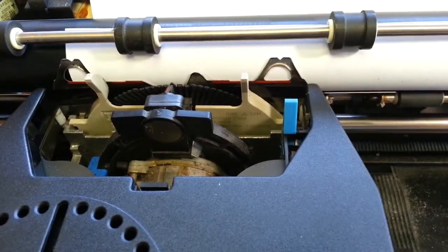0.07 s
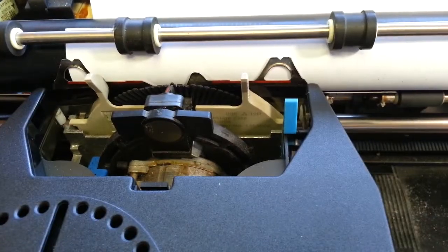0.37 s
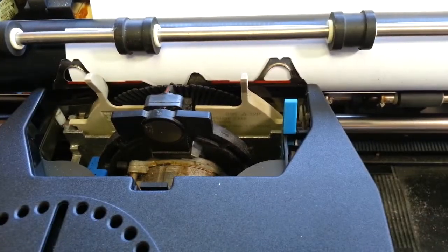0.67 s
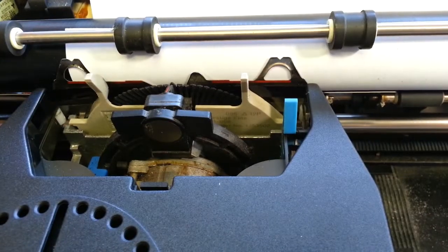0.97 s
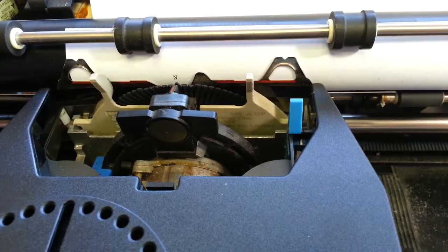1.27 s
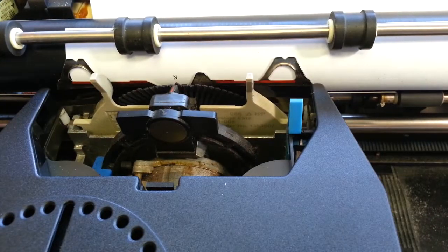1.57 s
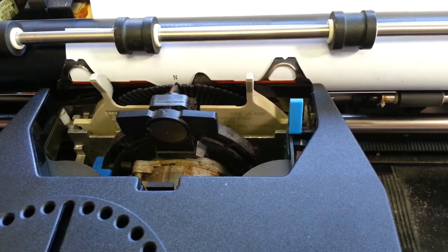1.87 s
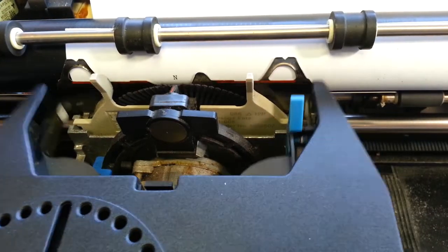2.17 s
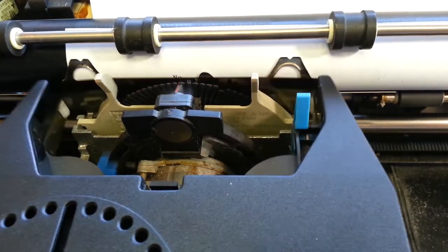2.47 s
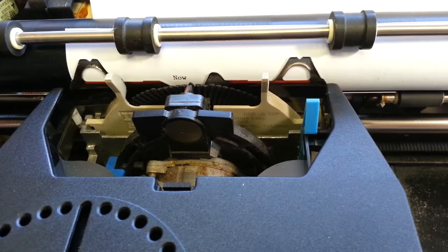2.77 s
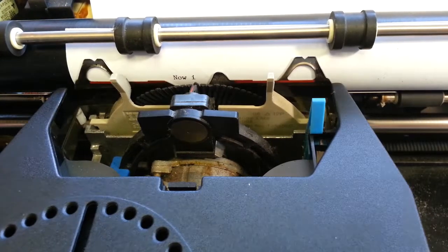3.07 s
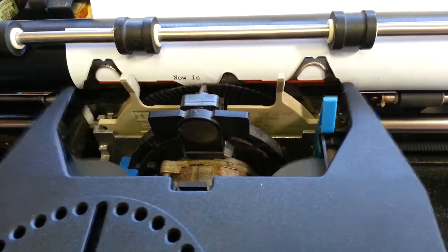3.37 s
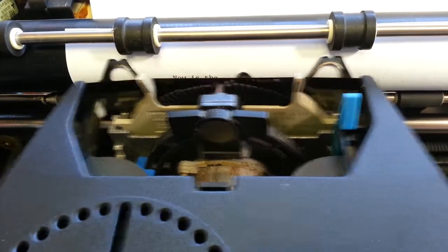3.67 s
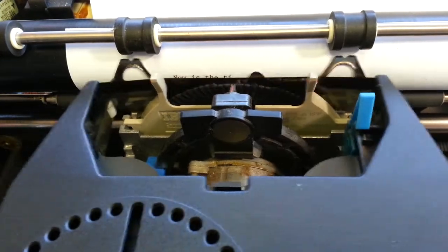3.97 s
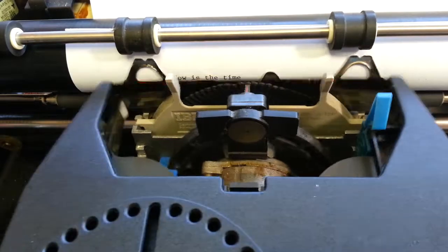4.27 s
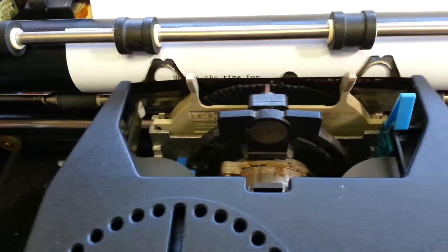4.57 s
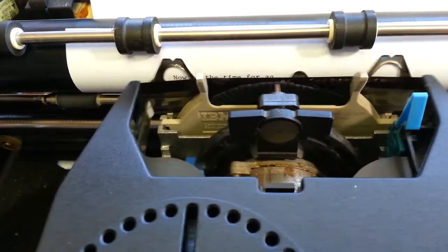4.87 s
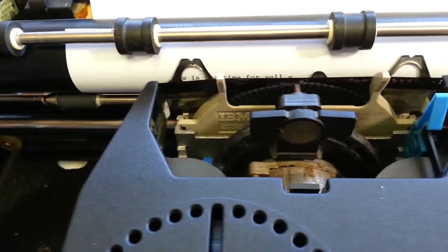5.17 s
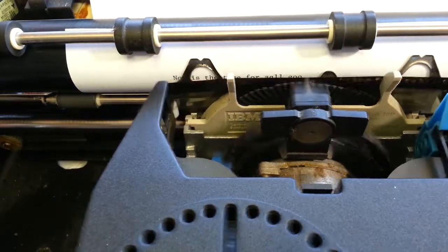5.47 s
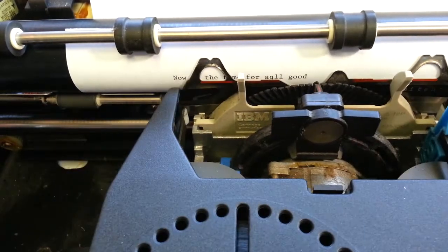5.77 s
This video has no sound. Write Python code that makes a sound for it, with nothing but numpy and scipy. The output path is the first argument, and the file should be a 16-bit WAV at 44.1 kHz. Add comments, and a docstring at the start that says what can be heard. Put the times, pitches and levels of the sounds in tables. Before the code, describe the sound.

An electric typewriter idles with a faint hum and whirr in a quiet workshop. A few light key clicks lead to one sharp letter strike. After a pause of about a second, typing resumes and quickens into uneven bursts of metallic cracks, with rattling levers and the knock of the carrier stepping along. The stereo microphones are very close, and the room adds little echo.

```python
"""Electric ball typewriter, close up.

A quiet workshop, a stereo pair of microphones just above the carrier: a few keys, one letter, then a
quick line. Each letter is a print cycle: clutch and linkages rattle, the type ball cracks against the
platen, the carrier steps and knocks home. The motor hums underneath, and the hardest blows overload
the microphones."""
import sys
import numpy as np
from scipy import signal
from scipy.fft import rfft, irfft, next_fast_len
from scipy.io import wavfile
from scipy.ndimage import uniform_filter1d, map_coordinates

SR = 44100
rng = np.random.default_rng(int(sys.argv[2]) if len(sys.argv) > 2 else 0)


def digitize_waveform(pressure):
    """Quantize a signal to 16-bit integers and store it at the path in sys.argv[1].

    Rows of a 2-D input are taken as channels; values are limited to [-1, 1].
    """
    field = np.atleast_2d(pressure).T
    bounded = np.clip(field, -1, 1)
    quanta = np.round(bounded * 32767).astype(np.int16)
    wavfile.write(sys.argv[1], SR, quanta)


N = 265173

# letters, as the ball meets the platen: t/s, then relative level/dB of ball, rocker, carrier, ball turn
STRIKES = [(1.146, -1.5, 3, 2, 3), (2.2826, -4.5, 2, 2.5, -2), (2.5391, -7, -1, 1, -6),
           (3.0054, -5.5, 5, 4, 1), (3.2185, -7, 0, -1, 1), (3.4941, -8, -1, 1, -3),
           (3.5619, -4, -2, -3, 0), (3.6462, -6.5, 0, 1, 4), (3.9224, -6, 5, -2, 1),
           (3.9845, -9, -2, -1, -1), (4.0469, -7, -5, -3, 0), (4.1097, -9.5, -1, -5, 3),
           (4.3631, -7, 0, 0, -1), (4.4455, -7, 2, 1, 3), (4.5082, -8, -5, -1, 4), (4.7905, -8, 0, -4, -2),
           (4.8681, -5.5, 0, -2, 0), (4.9463, -6.5, 2, 1, 2), (5.0078, -8.5, -2, -1, 0),
           (5.157, -4.5, -7, 0, 0), (5.2471, -4.5, 0, 1, -2), (5.4605, -7, 3, 1, -6),
           (5.5285, -1.5, 1, 6, 4)]
# spaces, as the carrier lands: t/s, latch lead/s, relative level/dB of latch and landing's three bands
SPACES = [(2.702, .069, -2, -7, -12.5, -28), (3.283, .078, 1, -13, -12, -17),
          (3.733, .045, -12, -15, -13, -14), (4.272, .073, 2, -15, -10, -14),
          (4.602, .055, 1, -11, -14.5, -36), (5.105, .07, -1, -14, -16, -22),
          (5.714, .046, 1, -6, -5.5, -27), (5.965, .058, -7, -6.5, -8.5, -17)]
# stretches of typing, linkages in motion: start t/s, end t/s, relative level/dB
TYPING_RUNS = [(1.07, 1.29, -1.5), (2.197, 2.69, -2.5), (2.757, 2.775, -4), (2.915, 4.72, .5),
               (4.745, 5.745, -1.2), (5.945, 5.975, -3)]
# the three bands of a contact (body, middle, edge): low f/Hz, high f/Hz
BANDS = [(400, 1000), (1000, 2800), (2800, 15500)]


def amp(db):
    """Decibels to gain."""
    return 10 ** (np.asarray(db) / 20)


def unit(x):
    """x at rms 1."""
    return x / np.sqrt(np.mean(x ** 2) + 1e-20)


def along(points, hz):
    """Interpolate (f/Hz, value) points on a log axis."""
    f, value = np.transpose(points)
    return np.interp(np.log(hz + 1), np.log(f + 1), value)


def add(track, start, sound):
    """Lay a stereo sound into the track at start seconds."""
    part = track[:, max(round(start * SR), 0):][:, :sound.shape[1]]
    part += sound[:, :part.shape[1]]


def filtered(x, response):
    """Pass x through a complex frequency response."""
    n = x.shape[-1]
    size = next_fast_len(n + SR // 8, True)
    return irfft(rfft(x, size) * response(np.fft.rfftfreq(size, 1 / SR)), size)[..., :n]


def coloured(x, tone, size=2048):
    """Minimum-phase filter through (f/Hz, level/dB) points."""
    cepstrum = irfft(np.log(amp(along(tone, np.fft.rfftfreq(size, 1 / SR)))))
    cepstrum[1:size // 2] *= 2
    cepstrum[size // 2 + 1:] = 0
    kernel = irfft(np.exp(rfft(cepstrum))).reshape((1,) * (x.ndim - 1) + (-1,))
    return signal.fftconvolve(x, kernel, axes=-1)[..., :x.shape[-1]]


def band(x, edges, order=3):
    """Causal band-pass."""
    return signal.sosfilt(signal.butter(order, edges, 'band', fs=SR, output='sos'), x)


def resonance(hz, centre, width):
    """Response of one damped mode."""
    return 1j * hz * width / (centre ** 2 - hz ** 2 + 1j * hz * width)


def spread(pair):
    """Two unrelated signals reach the microphones alike in the bass, apart in the treble."""
    # likeness of left and right: f/Hz, correlation
    likeness = [(60, 1), (250, 0.66), (650, 0.86), (1200, 0.53), (2000, 0), (4000, 0), (12000, 0.069)]

    def weights(hz):
        angle = np.arccos(np.clip(along(likeness, hz), -1, 1)) / 2
        return np.array([np.cos(angle), np.sin(angle)])

    mid, side = filtered(pair, weights)
    return np.stack([mid + side, mid - side])


def lean(x):
    """Some registers sit to the left, others to the right."""
    # stereo balance: f/Hz, left minus right level/dB
    balance = [(60, -8), (110, 6.5), (200, -3.5), (380, -4), (700, -2), (1290, -4.0), (2380, -2),
               (4400, 6.5), (8120, 0.0), (15000, 6.5)]
    return filtered(x, lambda hz: amp(np.outer([.5, -.5], along(balance, hz))))


def stereo_noise():
    """White noise across both microphones."""
    return spread(rng.standard_normal((2, N)))


def room_air():
    """Steady room tone of the workshop."""
    # spectrum of the air: f/Hz, relative level/dB
    air_tone = [(25, -52), (50, -23), (90, -10.5), (160, -12), (240, -13.5), (330, -12.5), (480, -19.5),
                (640, -18.5), (1000, -22.5), (3200, -21.5), (4500, -24.5), (5800, -33), (9000, -34),
                (14500, -34.5)]
    return unit(coloured(stereo_noise(), air_tone))


def drone():
    """A faint low drone swells twice."""
    # swells: t/s, relative level/dB, half width/s
    swells = [(.25, -51, .14), (1.94, -49, .09)]
    t = np.arange(N) / SR
    gain = sum(amp(db) * np.exp(-((t - peak) / width) ** 2) for peak, db, width in swells)
    return gain * unit(band(stereo_noise(), (285, 330), order=2))


def workshop(x, wet_db):
    """The cluttered room adds a short tail, 5 ms behind the direct sound."""
    # reverberation: f/Hz, t60/s
    decay_times = [(150, 0.41), (700, 0.27), (2500, 0.16), (6000, 0.31), (14000, 0.2)]
    hz, t, spectra = signal.stft(rng.standard_normal((2, SR // 2)), SR, nperseg=256)
    fade = amp(-60 * t / along(decay_times, hz)[:, None])
    tail = signal.istft(spectra * fade, SR, nperseg=256)[1]
    tail = np.pad(spread(tail), ((0, 0), (SR // 200, 0)))
    return x + amp(wet_db) * signal.fftconvolve(x, tail / np.linalg.norm(tail[0]), axes=1)[:, :N]


def motor():
    """The idling motor and belt hum and whirr in narrow resonances."""
    # motor and belt resonances: f/Hz, width/Hz, relative level/dB
    modes = [(66.8, 4, 1), (112, 12, -4), (694, 26, -1), (1600, 81, 0.5), (2204, 74, 1.5), (2370, 80, -4),
             (2653, 54, -2.5), (2840, 13, -1), (3260, 140, -7)]

    def response(f):
        return sum(amp(db) * abs(resonance(f, hz, width)) ** 2 / np.sqrt(width) for hz, width, db in modes)

    return unit(filtered(stereo_noise(), response))


def frame(x, ring_db):
    """Every blow sets the steel frame ringing."""
    # frame modes: f/Hz, width/Hz, relative level/dB
    modes = [(610.7, 19.5, -4), (724, 28, 8.5), (830, 27, -10), (1203, 21, 1.5), (1312, 46, 0),
             (1618, 87, -1), (2300, 68, -1), (2540, 20, -4), (3110, 16, -12), (3650, 22, -5),
             (4010, 20, -22), (5200, 38, -10)]
    ring = filtered(x, lambda f: sum(amp(db) * resonance(f, hz, width) for hz, width, db in modes))
    return x + amp(ring_db) * ring


def metal(force):
    """Small steel parts with too many modes to tell apart."""
    # spectrum of the steel: f/Hz, relative level/dB
    steel_tone = [(200, -19.5), (400, -10), (600, -4), (800, -3), (1300, -3), (2000, -2), (2600, -2),
                  (4300, -6.5), (5200, -10.5), (7000, -12.5), (10000, -18.5), (14500, -22)]
    return coloured(force, steel_tone)


def rattle(per_s, spike_db, life_s):
    """Dense tiny collisions of random size, each ringing for an instant."""
    hits = (rng.random(N) < per_s / SR) * amp(spike_db * np.minimum(rng.exponential(1, N), 3))
    energy = signal.lfilter([1], [1, -np.exp(-2 / (life_s * SR))], hits ** 2)
    return rng.standard_normal((2, N)) * np.sqrt(energy)


def shaft(rise_db_per_s=700, fall_db_per_s=600):
    """Gain of the cycle shaft: it spins up into each stretch of typing and runs down after it."""
    t = np.arange(N) / SR
    ramps = [db + np.minimum(np.minimum(rise_db_per_s * (t - start), fall_db_per_s * (end - t)), 0)
             for start, end, db in TYPING_RUNS]
    return amp(np.max(ramps, axis=0))


def dwells():
    """Gains of levers and springs: they rest before the ball locks and around each carrier landing."""
    # rests in a print cycle: t/s from the strike, half width/s, lever level/dB, spring level/dB
    letter_rests = [(-.013, .008, -5, -9), (.045, .017, -3, -9)]
    space_rests = [(-.014, .013, -3, -10)]
    t = np.arange(-SR // 8, SR // 8) / SR
    db = np.zeros((2, N))
    for events, rests in ((STRIKES, letter_rests), (SPACES, space_rests)):
        dip = sum(np.outer(depths, np.exp(-((t - at) / width) ** 2)) for at, width, *depths in rests)
        for at, *_ in events:
            add(db, at + t[0], dip)
    return amp(db)


def jolts(delay_s=.034, space_db=-3.5, rise_db_per_s=240, fall_db_per_s=260):
    """Gain of the case's thud: it swells to each carrier step and dies away."""
    t = np.arange(N) / SR
    steps = [(at + delay_s, .25 * carrier_db) for at, _, _, carrier_db, _ in STRIKES]
    steps += [(at, space_db) for at, *_ in SPACES]
    ramps = [db + np.minimum(rise_db_per_s * (t - at), fall_db_per_s * (at - t)) for at, db in steps]
    return amp(np.max(ramps, axis=0))


def linkages(thud_db, shake_db, lever_db, spring_db, surge_db):
    """While the shaft turns, levers and springs rattle in quick surges and the case thuds."""
    # spectrum of the case: f/Hz, relative level/dB
    case_tone = [(18, -47), (30, -26.5), (75, -11), (108, -8), (152, 2), (184, -1), (247, 1.5), (328, -0.5),
                 (450, -2.5), (580, -18.5), (990, -120)]
    t = np.arange(N) / SR
    turning = shaft()
    case_gain = amp(thud_db) * np.hypot(jolts(), amp(shake_db) * turning)
    lever_gain, spring_gain = turning * dwells()
    surge = unit(amp(surge_db * map_coordinates(rng.standard_normal(N // 100), [t * 70])))
    case = coloured(rattle(per_s=200, spike_db=-2.5, life_s=.0078), case_tone)
    levers = band(metal(rattle(per_s=500, spike_db=-1, life_s=.0074)), (400, 2800))
    springs = band(metal(rattle(per_s=480, spike_db=1.5, life_s=.0036)), BANDS[2])
    levers = amp(lever_db) * lever_gain * unit(spread(levers))
    springs = amp(spring_db) * spring_gain * unit(spread(springs))
    return case_gain * unit(spread(case)) + surge * (levers + springs)


def contacts(rows, part, gains_db, t60s, rise_s, hold_s, tail_db, tail_t60, grain_db):
    """Each row (t/s, body, middle, edge level/dB) shakes a part; each band has its own decay."""
    starts, *band_db = np.transpose(rows)
    t = np.arange(SR // 10) / SR
    ringing_s = np.maximum(t - hold_s, 0)  # the parts chatter for a moment before they ring out
    attack = 1 - np.exp(-t / rise_s)
    tail = amp(tail_db - 60 * ringing_s / tail_t60)
    grain = amp(grain_db * unit(uniform_filter1d(rng.standard_normal((len(starts), 1, len(t))), 90)))
    hits = 0
    for edges, db, gain_db, t60 in zip(BANDS, band_db, gains_db, t60s):
        envelope = attack * (amp(-60 * ringing_s / t60) + tail)
        force = rng.standard_normal((len(starts), 2, len(t))) * grain * envelope
        ring = band(part(force), edges)
        ring /= np.sqrt(np.mean(ring ** 2, axis=(1, 2), keepdims=True))
        hits = hits + ring * amp(db + gain_db)[:, None, None]
    track = np.zeros((2, N))
    for start, hit in zip(starts, hits):
        add(track, start, hit)
    return spread(track)


def key_lever(force, snap=22):
    """A key lever meets its stop with one clean snap that rings a few broad modes."""
    # lever modes: f/Hz, width/Hz, relative level/dB
    modes = [(815, 190, -1), (1023, 173, 1), (1750, 160, 3), (2370, 180, -6.5), (2940, 290, -7),
             (4400, 450, -6.5), (5550, 520, -12), (8000, 3200, -21.5)]
    impulse = np.outer([1, .5], np.arange(force.shape[-1]) == SR // 1000)
    return filtered(force + snap * impulse, lambda f: sum(
        (-1) ** k * amp(db) * resonance(f, hz, width) for k, (hz, width, db) in enumerate(modes)))


def keyboard():
    """Key levers click, mostly ahead of the quick line."""
    # key contacts: t/s, relative level/dB of body, middle, edge
    presses = [(0.549, -30.5, -32, -39.5), (0.573, -39, -24.5, -26), (0.711, -24.5, -15.5, -21),
               (0.783, -24.5, -23.0, -33), (0.797, -27.5, -23.5, -24.5), (1.038, -40.0, -24, -30),
               (1.045, -25, -21, -22.0), (1.742, -18, -13, -19), (2.171, -45, -24.5, -43),
               (2.181, -26, -15.5, -20.5), (2.903, -24, -12.5, -19.5), (3.888, -19, -17, -20),
               (5.399, -16.5, -23, -35.0)]
    return contacts(presses, key_lever, gains_db=[-14.5, -12.5, -13], t60s=[.035, .035, .03],
                    rise_s=.00073, hold_s=.0037, tail_db=-12, tail_t60=.15, grain_db=.5)


def small_clicks(count=60, per_s=10, bands_db=(-38, -28, -25), scatter_db=2):
    """Contact rows for small levers and pawls that click at random while the linkages move."""
    times = TYPING_RUNS[0][0] + np.cumsum(rng.uniform(.3, 1.7, count)) / per_s
    rows = np.column_stack([times, bands_db + scatter_db * rng.standard_normal((count, 1))])
    typing = np.any([(times > start) & (times < end) for start, end, _ in TYPING_RUNS], axis=0)
    return rows[typing]


def space_cycles():
    """Knock and chatter rows for every space: the carrier steps without printing."""
    knocks, chatter = [], []
    for at, lead, latch_db, *landing_db in SPACES:
        knocks += [(at - lead, *np.add((-23, -12, -18), latch_db)),  # the latch trips
                   (at - .02, -17, -20, -36),  # the pawl lifts
                   (at, *landing_db)]
        chatter.append((at + .012, *np.add(landing_db, -11)))  # the carrier rebounds
    return knocks, chatter


def print_cycles(cycle_s=.1, scatter_s=.001, scatter_db=1):
    """Knock and chatter rows for every letter; the clutch holds if the next comes within cycle_s."""
    # the clutch grabs the shaft to start a word or a lone letter: t/s, relative level/dB
    clutch_grabs = [(1.088, 1), (2.2, 2), (2.922, 4), (3.135, 1), (3.838, 1), (4.178, -3), (4.283, 1),
                    (4.708, -5), (5.082, -4), (5.374, -2)]
    strikes, _, rocker_db, carrier_db, turn_db = np.transpose(STRIKES)
    last_strikes = strikes[np.r_[np.diff(strikes) > cycle_s, True]]

    def scattered(times, bands_db, accent_db=0):
        rows = np.column_stack(np.broadcast_arrays(times, *(db + accent_db for db in bands_db)))
        return rows + rng.standard_normal(rows.shape) * [scatter_s, scatter_db, scatter_db, scatter_db]

    grab = [(at, *np.add((-36, -24.5, -17), db)) for at, db in clutch_grabs]
    carrier_step = scattered(strikes + .032, (-17.5, -16.5, -30), carrier_db)
    clutch_release = scattered(last_strikes + .069, (-34, -27, -22))
    ball_turn = scattered(strikes - .038, (-33, -24, -20.5), turn_db)
    rocker_return = scattered(strikes + .007, (-16.5, -17, -25), rocker_db)
    carrier_settle = scattered(strikes + .039, (-26, -23, -32), carrier_db)
    return [*carrier_step, *clutch_release], [*grab, *ball_turn, *rocker_return, *carrier_settle]


def mechanism():
    """Steel meets steel in letters and spaces: sharp knocks and longer bursts of chatter."""
    # levers hitting their stops hard: t/s, relative level/dB of body, middle, edge
    lever_stops = [(2.751, -18.5, -11, -12), (3.048, -22, -15, -25), (3.146, -19, -28, -19),
                   (3.316, -17, -17, -38), (3.352, -32, -21, -17), (3.381, -25, -19.5, -21),
                   (3.417, -14, -24, -19), (3.752, -19, -23, -42), (3.78, -30, -21, -17.5),
                   (3.809, -28, -22, -21), (3.861, -18, -17, -38), (3.968, -27, -13, -27),
                   (4.253, -19, -16, -31), (4.617, -34, -13.5, -14), (4.645, -27, -22, -20),
                   (4.914, -30, -15, -27), (5.735, -28, -16, -16)]
    letter_knocks, letter_chatter = print_cycles()
    space_knocks, space_chatter = space_cycles()
    knocks = contacts(np.vstack([letter_knocks, space_knocks, lever_stops, small_clicks()]), metal,
                      gains_db=[-15, -13.4, -13], t60s=[.042, .038, .033],
                      rise_s=.00012, hold_s=.0036, tail_db=-11.5, tail_t60=.087, grain_db=2.5)
    chatter = contacts(letter_chatter + space_chatter, metal,
                       gains_db=[-15, -13.5, -12.7], t60s=[.045] * 3,
                       rise_s=.00025, hold_s=.015, tail_db=-32, tail_t60=.18, grain_db=2)
    return knocks + chatter


def detents(lead_s=.005):
    """Just before each letter a detent clicks into the teeth of the ball and locks it."""
    rows = [(at - lead_s, -43.5, -31, -37.5) for at, *_ in STRIKES]
    return contacts(rows, metal, gains_db=[0, 0, 0], t60s=[.025] * 3,
                    rise_s=.00039, hold_s=.011, tail_db=-21, tail_t60=.1, grain_db=.5)


def type_ball(gain_db, scatter_db, split_hz, low_delay_s, chatter_db, chatter_t60, left_lag_s):
    """The ball slaps the platen: its high modes ping at once, heavier parts answer a moment later."""
    # modes of ball and platen: f/Hz, width/Hz, relative level/dB left and right
    modes = [(1200, 170, -20, -7.5), (2045, 78, -16.5, -8.5), (2550, 140, 5, -10.5), (3170, 130, -10.5, -4),
             (3560, 120, 1, -1), (4106, 90, 3.5, 4), (5210, 170, -4.5, 0), (5830, 300, 1, 4.5),
             (5852, 320, 4.5, -6.5), (8060, 1100, -47, -20), (13600, 470, -28, -23)]
    hz, width, left_db, right_db = np.transpose(modes)
    t = np.arange(SR // 16) / SR
    age = np.maximum(t - low_delay_s * (hz < split_hz)[:, None], 0)
    decay = np.exp(-np.pi * width[:, None] * age)
    polarity = (-1) ** np.arange(len(hz))
    track = np.zeros((2, N))
    for at, db, *_ in STRIKES:
        weights = amp([left_db, right_db] + rng.normal(0, scatter_db, len(hz))) * width * polarity
        pitch = hz * (1 + rng.normal(0, .0084, len(hz)))
        ring = unit(weights @ (np.sin(2 * np.pi * pitch[:, None] * age) * decay))
        # the ball chatters on its post as it falls back
        force = rng.standard_normal((2, len(t))) * amp(-60 * t / chatter_t60)
        chatter = unit(signal.fftconvolve(ring, force, axes=1)[:, :len(t)])
        add(track, at, amp(db + gain_db) * (ring + amp(chatter_db) * chatter))
    track = band(track, (500, 15500), order=2)
    # the print point is nearer to the right microphone
    return filtered(track, lambda f: np.exp(-2j * np.pi * np.outer([left_lag_s, 0], f)))


def scene():
    """Parts and ball sound through the frame, close to the microphones, over motor and room tone."""
    parts = keyboard() + mechanism()
    parts += linkages(thud_db=-31, shake_db=-16, lever_db=-27.5, spring_db=-29, surge_db=3.7)
    parts += detents()
    ball = type_ball(gain_db=-11.3, scatter_db=2, split_hz=4700, low_delay_s=.000771,
                     chatter_db=-8, chatter_t60=.064, left_lag_s=.00008)
    parts = workshop(lean(frame(parts, ring_db=-2.5)), wet_db=-16)
    ball = workshop(frame(ball, ring_db=-8), wet_db=-25.5)
    background = amp(-53) * motor() + amp(-49) * room_air() + amp(-2) * drone()
    return background + parts + ball


def record(dry):
    """The hardest blows overload the microphones and flatten; the top of the treble is cut off."""
    clipped = dry / (1 + dry ** 8) ** (1 / 8)
    return filtered(clipped, lambda hz: hz < 14900)


dry = scene()
out = record(dry)
digitize_waveform(out)
```